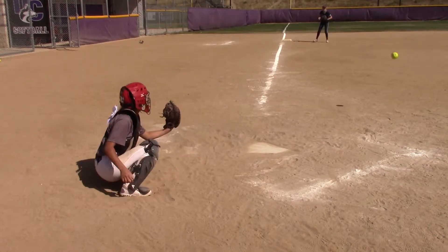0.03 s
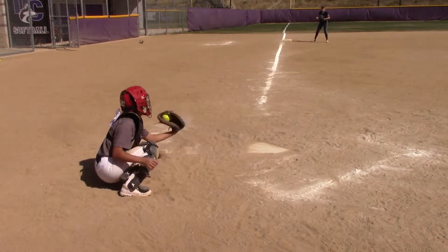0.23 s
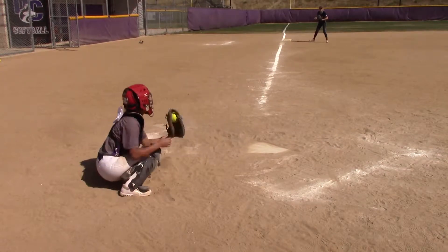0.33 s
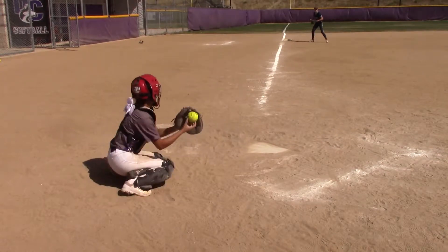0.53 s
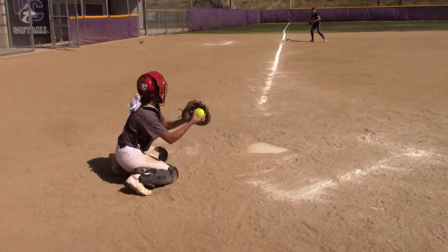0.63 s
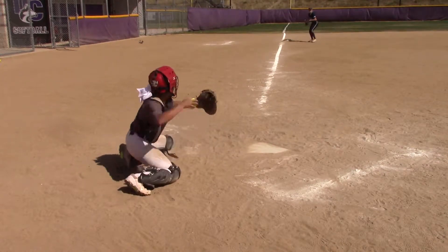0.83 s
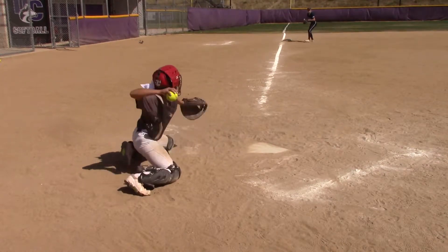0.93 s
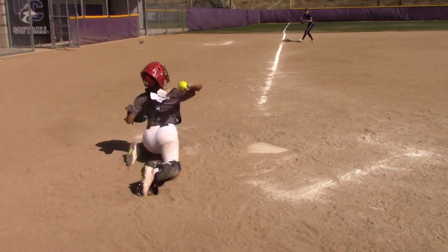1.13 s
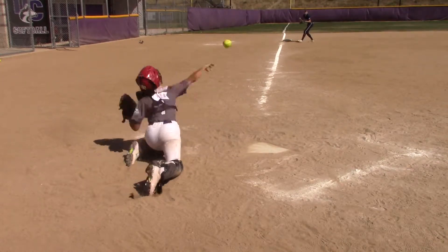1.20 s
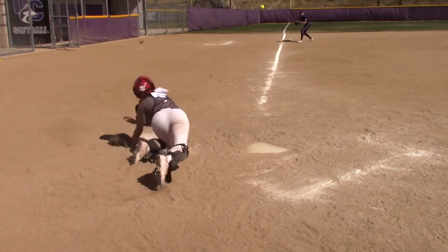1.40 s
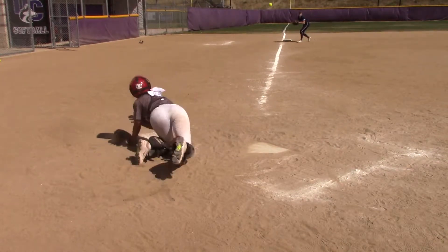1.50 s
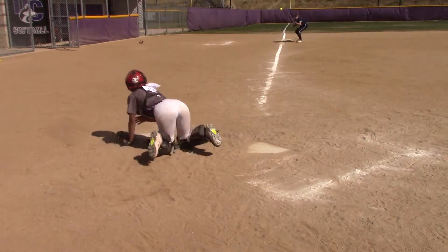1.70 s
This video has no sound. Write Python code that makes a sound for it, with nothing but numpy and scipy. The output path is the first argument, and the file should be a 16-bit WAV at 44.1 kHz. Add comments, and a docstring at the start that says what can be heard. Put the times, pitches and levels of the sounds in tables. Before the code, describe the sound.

On an outdoor dirt field, one loud, sharp pop of a ball hitting a nearby leather mitt echoes briefly. Much quieter shoe scuffs, a plastic click and a soft thud follow, with light puffs of wind on the microphone.

```python
"""On a softball field, a pitch smacks into a catcher's leather mitt a few metres away and overloads
the microphone. The mitt's pocket rings, and the backstop and dugout walls throw back dull echoes.
The catcher rises and throws: cleats scuff the dirt, the mitt creaks, a buckle tinks, a shin guard
clacks and a knee lands. Behind it all are puffs of wind, two faint tones and distant traffic."""
import sys
import numpy as np
from scipy import signal
from scipy.fft import rfft, irfft
from scipy.io import wavfile

SR = 44100
rng = np.random.default_rng(int(sys.argv[2]) if len(sys.argv) > 2 else 0)


def materialize(psi):
    """Save the field psi as 16-bit PCM at rate SR to the path in sys.argv[1].

    A 1-D psi becomes a single channel; in a 2-D psi each row is a channel.
    """
    bounded = np.clip(np.atleast_2d(psi).T, -1, 1)
    quanta = np.round(bounded * 32767).astype(np.int16)
    wavfile.write(sys.argv[1], SR, quanta)


N = 77175

# ringing notes of the pocket, plus (last row) a bright overtone from the overloaded microphone:
# f/Hz, level/dB, fade/s (time to drop 60 dB)
POP_NOTES = [(194, -15.5, .06), (350, -8, 0.029), (424, -8.5, 0.029), (764, -4.5, 0.022), (840, 8, 0.0093),
             (1877, 0, 0.013)]
# ringing notes of the closing leather: f/Hz, level/dB, fade/s
LEATHER_NOTES = [(220, -17.5, 0.047), (1134, -3.5, 0.013), (1250, -0.5, 0.0087), (2200, -6, 0.0083)]
# tone (how strong each pitch is) of the leather's crack: f/Hz, level/dB
CRACK_TONE = [(60, -24), (500, -4), (1300, -5.5), (1680, -9), (2000, 2), (2600, -1), (3000, -1), (4200, -1),
              (5200, -4), (5700, -14), (6500, -6), (8400, -6), (11000, -17), (16000, -27)]
# echoes off the walls: t/s, level/dB, f/Hz, cycles to the peak, scattered noise/dB
ECHOES = [(0.2367, -8, 537, 0.78, -30), (.243, -9.5, 508, 1.19, -19.5), (.267, -10, 558, 0.99, -17),
          (0.2719, -15.5, 392, 1.03, -23), (0.3102, -20, 487, 0.93, -30), (0.3123, -20, 375, 1.63, -28),
          (0.3459, -28.5, 560, 2.5, -36), (0.3578, -22, 490, 1.38, -27.5)]
# tone of the noise scattered by the walls, and of the tail from the fences: f/Hz, level/dB
SCATTER_TONE = [(60, -32), (190, -2.5), (900, 8.5), (1600, -2.5), (3500, -8), (6000, -21), (9000, -32),
                (15000, -46)]
TAIL_TONE = [(50, -50), (120, -10), (200, 2.5), (450, 3.5), (900, -0.5), (1500, -11.5), (2200, -12),
             (4000, -17), (8000, -29.5), (15000, -57)]
# shoes and gear rubbing on dirt: peak t/s, rise/s, fall/s, body/dB, rasp/dB, grit/dB
SCUFFS = [(0.451, .0012, 0.0032, -34, -44, -50), (.508, 0.0056, 0.0075, -49, -47, -59),
          (.64, 0.0081, 0.024, -48, -41.5, -53.5), (.682, 0.012, 0.014, -35.5, -39.5, -39),
          (.725, 0.033, 0.036, -62, -52, -57), (.76, .004, 0.0044, -44, -50, -50),
          (.852, 0.021, 0.026, -54, -46, -53), (.87, 0.0047, 0.0041, -42, -42.5, -37),
          (0.892, 0.0061, 0.0034, -44, -49, -36.5), (0.907, .003, .002, -54, -40, -27.5),
          (0.915, 0.0026, 0.0017, -36, -58, -30.5), (.927, 0.016, 0.019, -55, -66, -43),
          (1.002, 0.02, 0.014, -57, -58, -47), (1.08, 0.037, 0.064, -36, -47, -48),
          (1.145, 0.029, 0.03, -40.5, -40, -39.5), (1.182, 0.0098, 0.031, -36, -41.5, -34.5),
          (1.23, .005, .007, -33.5, -32, -41), (1.254, 0.0053, 0.0067, -29.5, -38, -35.5),
          (1.296, 0.025, 0.017, -42.5, -46, -45), (1.337, 0.03, 0.032, -47, -46, -46),
          (1.431, 0.032, 0.029, -41, -45, -45), (1.669, 0.0097, 0.035, -55, -50.5, -53),
          (1.725, .016, .06, -52, -41, -47.5)]
# tone of a scuff's dull body, rasp and bright grit: f/Hz, level/dB
BODY_TONE = [(100, -16), (300, -0.5), (600, 6), (1300, -2), (2000, -17), (5000, -33.5)]
RASP_TONE = [(600, -30), (1400, 0), (2400, 6.5), (3600, -3), (5500, -22.5), (12000, -24.5)]
GRIT_TONE = [(1500, -34), (3500, 1.5), (4600, 1), (5800, -0.5), (7500, 3), (9300, -1), (11000, -14.5),
             (15500, -31)]
# tone of the mitt's creak and the shin guard's click: f/Hz, level/dB
CREAK_TONE = [(1000, -35), (1900, -6), (2150, 0), (2450, -6), (4000, -32)]
CLICK_TONE = [(100, -30), (450, -16), (750, 0), (1200, -6), (2700, 0), (4500, -8), (8000, -9), (11000, -16),
              (14000, -34)]
# ringing notes of the buckle and the shin guard: f/Hz, level/dB, fade/s
BUCKLE_NOTES = [(7400, -39, .035), (11130, -38, .035), (13480, -39, .06)]
GUARD_NOTES = [(690, -14, 0.013), (1650, -15, .01), (2620, -13, .008), (3160, -20, 0.0065)]
# knee and foot landing: t/s, level/dB, f/Hz, fade/s
THUDS = [(1.415, -28, 238, 0.064), (1.4296, -16, 275, 0.016)]
# puffs of wind: t/s, width/s, level/dB
PUFFS = [(.02, 0.045, -58), (.63, .025, -49), (.908, .012, -41), (1.1, 0.017, -54), (1.394, 0.023, -42.5),
         (1.648, .012, -53)]
# tone of their rumble: f/Hz, level/dB
PUFF_TONE = [(20, -20), (60, -2), (100, -2), (170, 1), (300, -13), (800, -50)]
# far-off tones: t/s, half length/s, f/Hz, level/dB
FAR_TONES = [(0.384, 0.011, 3110, -49), (0.842, .045, 695, -45)]
# tone of the outdoor noise both ears share, and of the part that differs: f/Hz, level/dB
AIR_TONE = [(25, -43), (50, -27), (90, -6), (130, -2), (215, -.5), (290, -3.5), (520, -4.5), (700, -3),
            (900, -6.5), (1300, -12.5), (2000, -20), (2700, -22.5), (4400, -29.5), (6000, -33.5),
            (8600, -32), (11000, -42), (16000, -53)]
SIDE_TONE = [(25, -9), (80, -5), (200, -6), (600, -8), (2000, -16.5), (5000, -27), (9000, -37),
             (16000, -60)]

CATCH_S, CLOSE_S = .21573, .22126  # the ball hits the pocket; the leather slaps round it
CRACK_RISE_S = .00076
TIME = np.arange(N) / SR


def catch(sink_s=.00069):
    """The ball sinks in with a pop, brightened by microphone overload; the leather cracks and slaps."""
    pop = ring(CATCH_S, POP_NOTES) * (1 - np.exp(-since(CATCH_S) / sink_s))
    slap = ring(CLOSE_S, LEATHER_NOTES)
    crack = burst(CATCH_S, CRACK_TONE, db=-6, rise_s=CRACK_RISE_S, fade_s=.021)
    return low_cut(pop - slap + crack)


def echoes(upper_hz=872):
    """Each wall returns the catch as a short, hollow knock; the fences scatter a soft tail."""
    out = 0
    for start, db, hz, cycles, scatter_db in ECHOES:
        t = since(start)
        age = t * hz / cycles  # 1 at the knock's peak
        # the pocket's main note comes back more weakly, as the upper of two notes
        notes = np.sin(2 * np.pi * hz * t) + undb(-8) * np.sin(2 * np.pi * upper_hz * t)
        knock = undb(db) * (age * np.exp(1 - age)) ** 2 * notes
        thump = low_cut(ring(start, [(190, db - 17, .04)]))  # the mitt's low thump rings on
        scatter = burst(start, SCATTER_TONE, scatter_db, CRACK_RISE_S, fade_s=.027)
        out = out + knock + thump + scatter
    tail, side = (burst(CATCH_S, TAIL_TONE, db=-24.5, rise_s=.004, fade_s=.43) for _ in range(2))
    return widen(out + tail, undb(-17) * side)


def scuffs():
    """Soles rub on dirt: each scuff swells and fades with its own mix of body, rasp and grit."""
    power = np.zeros((3, N))
    for peak, rise, fall, *parts_db in SCUFFS:
        swell = np.exp(-np.abs((TIME - peak) / np.where(TIME < peak, rise, fall)) ** 1.2)
        power += (undb(parts_db)[:, None] * swell) ** 2
    stutter = undb(2 * wander(hz=108))  # the soles catch and slip
    sand = stutter * grains()
    tones = (BODY_TONE, RASP_TONE, GRIT_TONE)
    return sum(np.sqrt(part) * colour(sand, tone) for part, tone in zip(power, tones))


def grains(per_second=3000, spread_db=3, click_share=.62):
    """Sand grains click, a few much louder than the rest, over the hiss of smooth rubbing."""
    clicks = (rng.random(N) < per_second / SR) * rng.choice([-1, 1], N)
    clicks = clicks * undb(spread_db * np.minimum(rng.exponential(size=N), 2 * np.pi))
    hiss = rng.standard_normal(N)
    return np.sqrt(click_share) * clicks / clicks.std() + np.sqrt(1 - click_share) * hiss


def gear(creak_s=.504, tink_s=.6848, clack_s=1.2761):
    """The mitt creaks as it grips the ball, a buckle rings, and a plastic shin guard clacks."""
    creak = burst(creak_s, CREAK_TONE, db=-29, rise_s=.004, fade_s=.035)
    tink = ring(tink_s, BUCKLE_NOTES)
    click = burst(clack_s, CLICK_TONE, db=-14.5, rise_s=.0001, fade_s=.0065)
    clack = click + ring(clack_s, GUARD_NOTES)
    return creak + low_cut(tink + clack, hz=520)


def thuds():
    """Knee and foot land on packed dirt: each gives a low note and a weaker, shorter high one."""
    out = 0
    for start, db, hz, fade_s in THUDS:
        out = out + ring(start, [(hz, db, fade_s), (hz * 2.34, db - 3.5, fade_s / 2)])
    return low_cut(out)


def wind():
    """Light puffs rumble on the left and right microphone openings separately."""
    gust = sum(undb(db) * np.exp(-((TIME - peak) / width) ** 2) for peak, width, db in PUFFS)
    return gust * np.array([noise(PUFF_TONE), noise(PUFF_TONE)])


def far_tones(sag=.055):
    """Brief, faint tones from far off, each sagging in pitch at both ends."""
    out = 0
    for peak, half_length, hz, db in FAR_TONES:
        away = np.minimum(((TIME - peak) / half_length) ** 2, 10)
        phase = 2 * np.pi * np.cumsum(hz * (1 - sag * away)) / SR
        out = out + undb(db) * np.exp(-away ** 2) * np.sin(phase)
    return out


def outdoors(hum_hz=349.5, hum_width_hz=13.5):
    """Distant traffic with a faint hum; mostly the bass differs between left and right."""
    narrow_band = signal.iirpeak(hum_hz, hum_hz / hum_width_hz, fs=SR)
    hum = rng.standard_normal(N)
    for _ in range(2):
        hum = signal.lfilter(*narrow_band, hum)
    traffic = undb(-39.5 + .3 * wander(hz=7.6)) * noise(AIR_TONE)
    return widen(traffic + undb(-50) * hum / hum.std(), undb(-62) * noise(SIDE_TONE))


def ring(start, notes):
    """Notes that start together and die away."""
    t = since(start)
    return sum(undb(db) * np.sin(2 * np.pi * hz * t) * fade(t, fade_s) for hz, db, fade_s in notes)


def burst(start, tone, db, rise_s, fade_s):
    """Noise that rises quickly and dies away."""
    t = since(start)
    return undb(db) * noise(tone) * (1 - np.exp(-t / rise_s)) * fade(t, fade_s)


def colour(x, tone):
    """Shape a sound with a tone table, then scale it to a strength of 1."""
    hz, db = np.array(tone, float).T
    freqs = np.maximum(np.fft.rfftfreq(N, 1 / SR), 1)
    gain = undb(np.interp(np.log(freqs), np.log(hz), db))
    shaped = irfft(rfft(x) * gain, N)
    return shaped / shaped.std()


def noise(tone):
    """Random hiss with the given tone."""
    return colour(rng.standard_normal(N), tone)


def wander(hz):
    """A random drift, mostly slower than the given rate."""
    return noise([(hz, 0), (hz * 10, -100)])


def low_cut(x, hz=140):
    """Small struck things give off little bass."""
    return signal.sosfilt(signal.butter(2, hz, "high", fs=SR, output="sos"), x)


def undb(db):
    """Turn decibels into a multiplier."""
    return 10 ** (np.asarray(db) / 20)


def since(start):
    """Seconds since a moment, zero before it."""
    return np.maximum(TIME - start, 0)


def fade(t, fade_s):
    """Die away by 60 dB every fade_s seconds."""
    return np.exp(-np.log(1000) * t / fade_s)


def widen(shared, side):
    """Add the side part on the left and subtract it on the right."""
    return shared + np.array([[1], [-1]]) * side


def pan(x, db):
    """Make the left louder than the right by db."""
    return x * undb([[db / 2], [-db / 2]])


def scene():
    """The catcher is ahead and a little to the left, in the open air."""
    player = pan(scuffs() + gear() + thuds(), db=.5)
    return pan(catch(), db=.66) + pan(echoes(), db=.4) + player + wind() + far_tones() + outdoors()


def record(dry, top_hz=16000):
    """The microphone rounds off the loudest peaks, and the highest treble is cut."""
    rounded = dry / (1 + dry ** 4) ** (1 / 4)
    return signal.sosfilt(signal.ellip(8, .2, 70, top_hz, fs=SR, output="sos"), rounded)


dry = scene()
out = record(dry)
materialize(out)
```